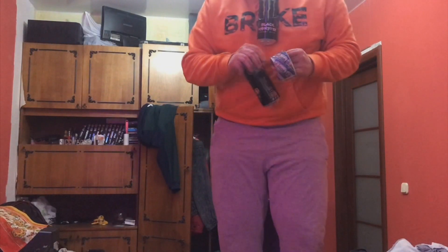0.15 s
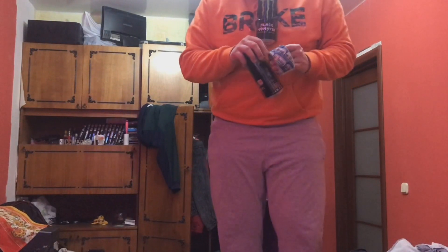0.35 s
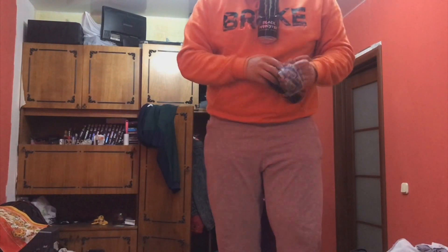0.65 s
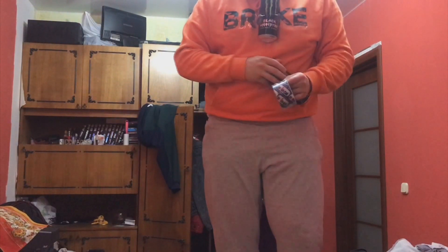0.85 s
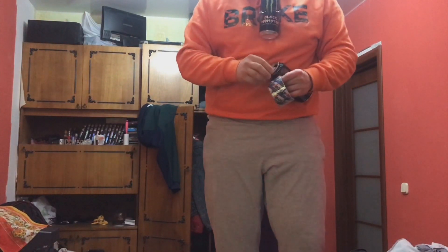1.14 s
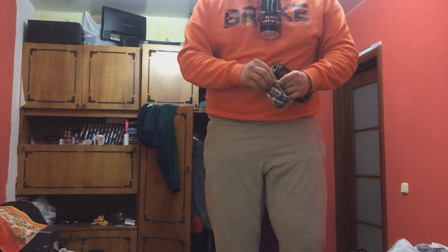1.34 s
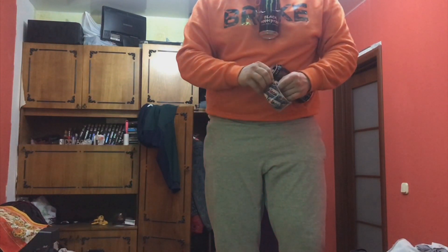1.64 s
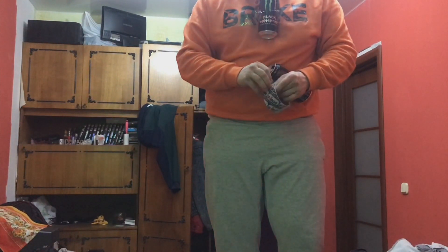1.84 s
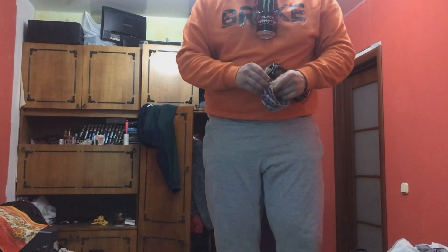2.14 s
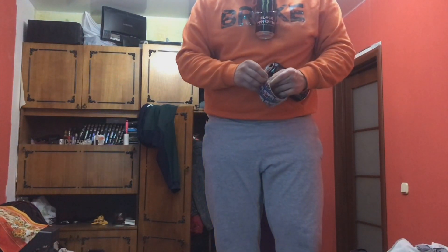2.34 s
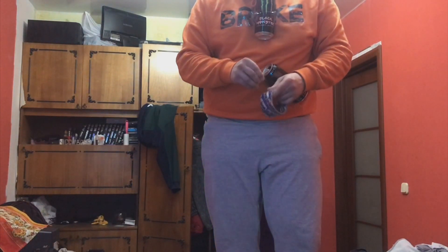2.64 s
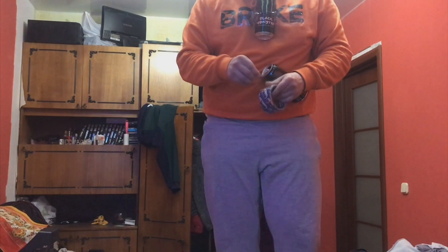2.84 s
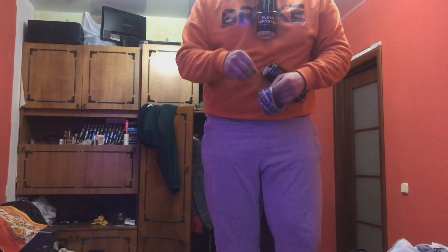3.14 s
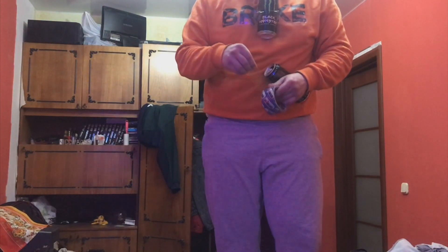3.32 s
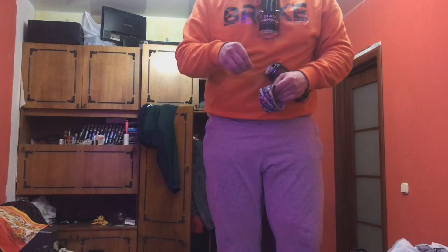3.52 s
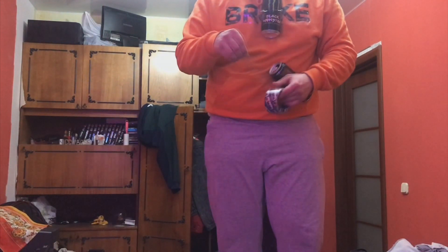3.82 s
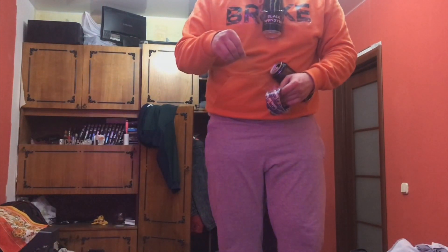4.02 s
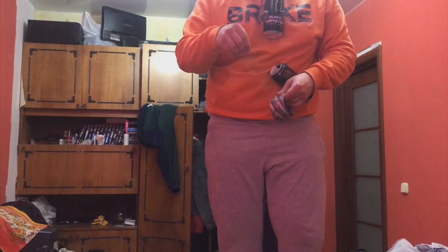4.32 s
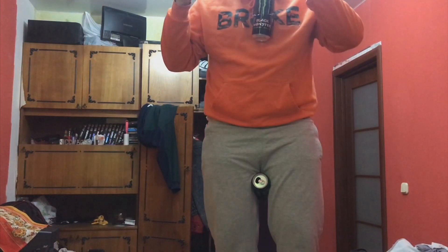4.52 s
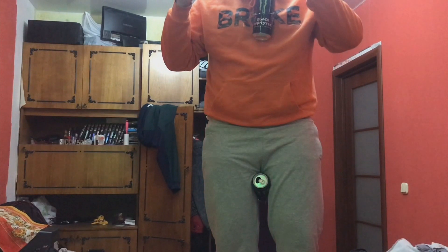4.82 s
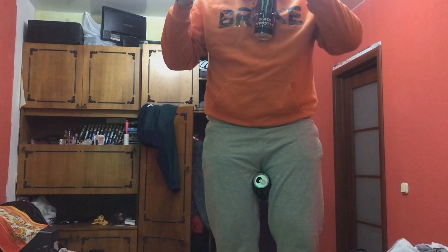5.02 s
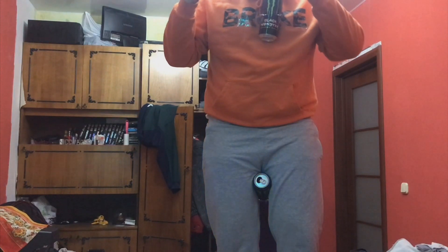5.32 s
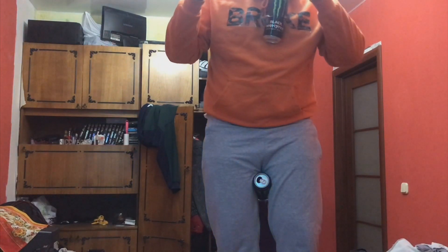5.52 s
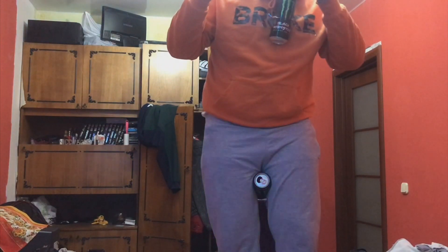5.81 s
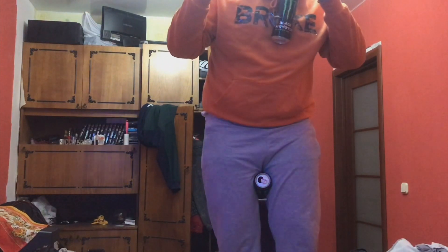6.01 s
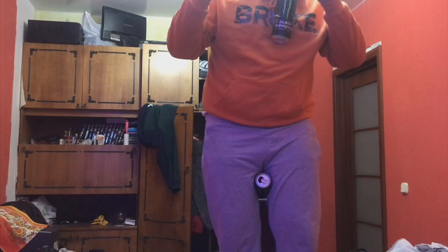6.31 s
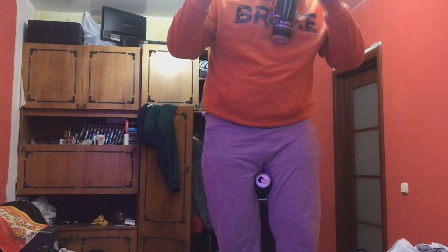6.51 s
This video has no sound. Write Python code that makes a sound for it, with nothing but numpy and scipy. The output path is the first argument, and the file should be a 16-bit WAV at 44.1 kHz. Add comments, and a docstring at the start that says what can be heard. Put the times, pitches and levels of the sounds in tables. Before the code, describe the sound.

A small furnished room with a quiet, dull low floor and short echoes; the microphone is about a metre away. From 0 to 1.2 s fingers shift on thin metal cans with soft, low knocks and rubs. Near 1.7 s two tiny bright clicks sound, then a short crackle at 1.9 s. Around 2.4 to 2.65 s clicks quicken into a loud tinny crunch. Hard, hollow cracks follow at 3.15 to 3.25 s, and a dense, very loud crushing burst with a low thump at 3.6 to 3.67 s. Further sharp snaps come at 4.14, 4.3 and 4.4 s, the last a rattling run. At about 4.5 s the sound and its echo cut off abruptly. Then it is sparse: a light knock, a small click at 4.75 s, faint rubs and ticks, a modest pop at 5.5 s, soft taps near 6 s, and a clear snap at 6.5 s.

```python
"""Squeezing thin aluminium cans

Thin drink cans are handled and squeezed about a metre away in a small furnished room, over a quiet floor.
Fingers knock and rub (filtered grains); each buckle is a noise-burst crack plus a damped panel note.
Hard squeezes set off runs and avalanches of buckles, softly limited where they overload the microphone.
Dull low noise rises and falls behind; early echoes and a diffuse noise tail make the room."""
import sys
import numpy as np
from scipy import signal
from scipy.fft import rfft, irfft
from scipy.io import wavfile
from scipy.ndimage import uniform_filter1d

SR = 44100
rng = np.random.default_rng(int(sys.argv[2]) if len(sys.argv) > 2 else 0)


def bounce(signal):
    """Save signal as a 16-bit WAV file at the path given by the first command-line argument."""
    frames = np.transpose(np.atleast_2d(signal))
    limited = np.clip(frames, -1, 1)
    pcm = np.round(limited * 32767).astype(np.int16)
    wavfile.write(sys.argv[1], SR, pcm)


N = 293706

# the hand takes a new grip, with a dull rub: start_s, length_s, level_db, centre_hz
HAND_GRIPS = [(0, 0.11, -51.5, 555), (0.182, 0.046, -52, 616), (0.426, 0.065, -54, 650),
              (0.736, 0.027, -55, 1730), (0.822, 0.028, -56.5, 1070), (0.915, 0.092, -54.5, 1320),
              (1.042, 0.045, -51.5, 680), (1.151, .026, -53, 930), (4.546, 0.035, -45.5, 620),
              (5.915, 0.038, -57, 480.7), (5.997, .01, -51, 1700), (6.283, .015, -57, 815)]
# skin creeps over the metal under pressure, with a thin hiss: start_s, length_s, level_db
SKIN_SLIDES = [(0.717, 0.3, -72.5), (2.155, 0.044, -59), (2.382, .04, -54.5), (2.82, .23, -58.5),
               (3.0557, .12, -54.5), (3.469, 0.18, -59), (4.113, 0.031, -54.5), (4.7062, 0.06, -54.5),
               (4.94, .17, -67.5), (5.4173, 0.11, -58.5), (5.8322, 0.13, -57), (6.096, 0.05, -54)]


def amp(db):
    """Decibels to gain."""
    return 10 ** (np.asarray(db) / 20)


def unit(x):
    """Scales to an energy of 1."""
    return x / np.sqrt(np.sum(x ** 2) + 1e-20)


def read(points, hz):
    """Interpolates a table on a log-frequency axis."""
    f, value = np.transpose(points)
    return np.interp(np.log(hz + 1), np.log(f + 1), value)


def add(mix, start_s, sound):
    """Mixes a sound in at start_s."""
    part = mix[max(round(start_s * SR), 0):][:len(sound)]
    part += sound[:len(part)]


def band(x, hz, kind, order=2):
    """Causal Butterworth filter."""
    corner_hz = np.clip(hz, 10, SR / 2 - 100)
    return signal.sosfilt(signal.butter(order, corner_hz, kind, fs=SR, output="sos"), x)


def coloured(x, points, size=2048):
    """Minimum-phase filter with a given spectrum, so that attacks stay sharp."""
    log_gain = np.log(amp(read(points, abs(np.fft.fftfreq(size, 1 / SR)))))
    taps = np.fft.ifft(np.exp(signal.hilbert(log_gain).conj())).real
    return signal.oaconvolve(x, taps[:size // 2])[:len(x)]


def flat(x, amount=0.39):
    """Evens out the ripples in the spectrum of a short burst."""
    z = rfft(x)
    return unit(irfft(z / (abs(z) + 1e-9) ** np.clip(amount, 0, 1), len(x)))


def noise(points):
    """Steady noise of rms 1 with a given spectrum."""
    spectrum = rfft(rng.standard_normal(N)) * amp(read(points, np.fft.rfftfreq(N, 1 / SR)))
    return np.sqrt(N) * unit(irfft(spectrum, N))


def crack(low_hz, snap_s=0.00049, shell_s=0.0019, shell_db=-2.5, shell_hz=7000, leak_db=-30, size=1024):
    """A crease jumps in under a millisecond; the dense modes of the shell ring a moment longer."""
    t = np.arange(size) / SR
    jump, shell = rng.standard_normal((2, size))
    fall = np.exp(-t / (2 * snap_s))
    for _ in range(3):
        jump = flat(jump * fall)
    ring = band(shell * np.exp(-t / shell_s), shell_hz, "lowpass", order=1)
    burst = unit(jump * fall) + amp(shell_db) * unit(ring)
    # a small dent radiates little below its own corner frequency
    return unit(band(burst, low_hz, "highpass") - amp(leak_db) * burst)


def panel(hz, cycles=1.7, sag=.09, rise=1.0, overtone_db=-13, chatter=0.73, chatter_s=.0065, size=2048):
    """The flipped panel swings a few times, damped by the hand, its pitch sagging to hz as it relaxes."""
    t = np.arange(size) / SR
    turns = hz * t
    bent = turns + sag * cycles * (1 - np.exp(-turns / cycles))
    overtone = np.sin(2 * np.pi * bent * rng.uniform(1.7, 2.4)) * (hz < SR / 8)  # low notes only
    tone = np.sin(2 * np.pi * bent) + amp(overtone_db) * overtone
    swing = tone * np.exp(-turns / cycles) * (1 - np.exp(-turns / rise))
    # its creased edges chatter and keep nudging it
    push = (t == 0) + chatter * unit(rng.standard_normal(size) * np.exp(-t / chatter_s))
    return unit(band(signal.fftconvolve(swing, push), hz / 2, "highpass", order=1))


def buckle(crack_db, low_hz, note_hz, note_db):
    """A crack, the note of the panel that flips, and the faint answer of the hollow body."""
    hollow_hz, hollow_db = 335, -27.5  # level relative to the panel
    hollow = panel(hollow_hz, cycles=1.1, chatter=.25)
    sound = amp(note_db) * (panel(note_hz) + amp(hollow_db) * hollow)
    add(sound, 0, amp(crack_db) * crack(low_hz))
    return sound


def snaps():
    """Buckles placed one by one, some alone, some within runs, each a crack and a damped note."""
    # start_s, crack_db, crack_low_hz, note_hz, note_db
    placed_buckles = [(1.6922, -9, 5100, 5300, -15), (1.7073, -4.5, 5230, 5600, -34),
                      (1.8979, -9, 2500, 1890, -13.5), (2.423, -7.5, 2450, 5400, -8.5),
                      (2.469, -5, 2100, 2900, -9), (2.492, -1, 2020, 2820, -18),
                      (2.554, 7.5, 2470, 3000, -2.5), (3.1544, 14, 1850, 478, 1),
                      (3.2262, 10, 1500, 1450, 3), (3.594, 12, 1200, 2090, 14.5), (4.1395, 9, 750, 1400, 1),
                      (4.1448, -11.5, 690, 521, -4), (4.298, 12.5, 760, 1990, 5),
                      (4.301, -2, 700, 512, 1.5), (4.3755, 13.5, 891, 494, -3),
                      (4.752, -0.5, 4510, 1920, -7), (5.5035, 0, 1208, 1104, -9.5),
                      (6.525, 8.5, 2820, 930, -1)]
    out = np.zeros(N)
    for start_s, *row in placed_buckles:
        add(out, start_s, buckle(*row))
    return out


def folds(jitter_s=.0005, scatter_octaves=0.22):
    """Each buckle pushes the next one over; the run swells and dies, its note following the dent size."""
    # folds that run round the wall:
    # start_s, length_s, crack_db, crack_low_hz, first_note_hz, last_note_hz, note_db
    fold_runs = [(1.901, 0.012, 7, 3500, 1850, 1250, -1.5), (2.6, 0.043, 11, 1500, 1450, 878, 7),
                 (3.1794, 0.021, 17.5, 2198, 490, 450, 1.5), (3.637, .0307, 12, 1310, 1290, 480, -1.5),
                 (4.4045, 0.029, 17.5, 1205, 1580, 1150, 5)]
    step_s, peak_along, ends_db = .007, 0.34, -6  # peak as a fraction of the run
    out = np.zeros(N)
    for start_s, length_s, crack_db, low_hz, first_hz, last_hz, note_db in fold_runs:
        for along in np.linspace(0, 1, round(length_s / step_s) + 1):
            late, detune = rng.uniform(-1, 1, 2)
            swell_db = np.interp(along, [0, peak_along, 1], [ends_db, 0, ends_db])
            hz = first_hz * (last_hz / first_hz) ** along * 2 ** (scatter_octaves * detune)
            sound = amp(swell_db) * buckle(crack_db, low_hz, hz, note_db)
            add(out, start_s + along * length_s + jitter_s * late, sound)
    return out


def crushes(per_s=1100, spread_db=3, octaves=1.3, note_db=-2, low_hz=1600):
    """One fold triggers the next: a rush of buckles of all sizes."""
    # avalanches: start_s, length_s, level_db, typical_note_hz
    avalanches = [(1.899, .011, -24, 1675), (3.593, 0.024, -5.5, 1636), (3.638, .016, -13.5, 1820),
                  (3.652, .022, -9.5, 1358), (4.1377, 0.0052, -24, 1090), (4.412, .028, -15.5, 996),
                  (5.504, 0.0062, -28.5, 1230), (6.5229, 0.0073, -19, 1950)]
    out = np.zeros(N)
    for start_s, length_s, db, hz in avalanches:
        count = max(int(length_s * per_s), 2)
        pitches = rng.permutation(np.linspace(-1, 1, count))
        strengths = rng.permutation(np.linspace(-1, 1, count))
        for k in range(count):
            at_s = start_s + length_s * (k + rng.random()) / count
            gain = amp(db + spread_db * strengths[k]) * np.sqrt(length_s * SR / count / 2)
            add(out, at_s, gain * crack(low_hz))
            # large slow panels radiate less
            note_gain = gain * amp(note_db + 3 * min(pitches[k], 0))
            add(out, at_s, note_gain * panel(hz * 2 ** (octaves * pitches[k])))
    return out


def thumps():
    """Low, quickly damped thumps under the loudest buckles."""
    # start_s, note_hz, level_db
    low_thumps = [(3.602, 90.5, -13), (3.648, 164, -17), (4.141, 145, -22), (4.3, 150, -19.5),
                  (4.421, 125.9, -13.5)]
    out = np.zeros(N)
    for start_s, hz, db in low_thumps:
        add(out, start_s, amp(db) * panel(hz, cycles=0.91, chatter=.25))
    return out


def ticks(spread_db=3):
    """Creases tick on their own, and at uneven steps while skin creeps over them."""
    # faint lone ticks: start_s, peak_level_db
    lone_ticks = [(0.2628, -34), (0.9957, -38.5), (2.3117, -39), (5.309, -42), (5.7349, -40.5),
                  (5.8798, -32.5), (5.9987, -25), (6.2824, -45.5)]
    step_s, over_slide_db = .06, 17  # mean step; tick peak over the slide's level_db
    out, events = np.zeros(N), list(lone_ticks)
    for start_s, length_s, db in SKIN_SLIDES:
        steps = np.cumsum(step_s * rng.uniform(.5, 1.5, size=8))
        for at_s in [0, *steps[steps < length_s]]:
            events.append((start_s + at_s, db + over_slide_db + spread_db * rng.uniform(-1, 1)))
    for start_s, db in events:
        tick = crack(low_hz=3500, shell_db=1.5)
        add(out, start_s, amp(db) * tick / abs(tick).max())
    return out


def knocks(weaker_db=-1.0, scatter_octaves=0.21):
    """Fingers land on the can one after another during each grip, each exciting a short damped note."""
    finger_step_s, knock_db = 0.027, 24  # knock energy over the grip's level_db
    out = np.zeros(N)
    for start_s, length_s, db, hz in HAND_GRIPS:
        for k, at_s in enumerate(np.arange(0, length_s, finger_step_s)):
            note_hz = hz * 2 ** (scatter_octaves * rng.uniform(-1.06, 1))
            gain = amp(db + knock_db + k * weaker_db)
            add(out, start_s + at_s, gain * panel(note_hz, cycles=1.0, chatter=0.28))
    return out


def rubs(slips_per_s=150, smooth=0.07, width=1.9, fade=0.7, low_hz=360):
    """Skin sticks and slips on the wall: tiny grains over a smooth hiss."""
    slide_hz = 5700
    out = np.zeros(N)
    slips = rng.uniform(-1.1, 1, N) * (rng.random(N) < slips_per_s / SR)
    grains = smooth * rng.standard_normal(N) + slips
    for start_s, length_s, db, hz in HAND_GRIPS + [(*row, slide_hz) for row in SKIN_SLIDES]:
        stroke = grains[max(round(start_s * SR), 0):][:int(length_s * SR)]
        swell = signal.windows.tukey(len(stroke), .06) * np.exp(-fade * np.linspace(0, 1, len(stroke)))
        centred = band(stroke * swell, [hz / width, hz * width], "bandpass", order=1)
        body = band(centred, low_hz, "highpass")
        muffled = band(body, hz * 3.8, "lowpass", order=1)
        add(out, start_s, amp(db - 5) * np.sqrt(len(stroke)) * unit(muffled))
    return out


def tail(wet_db=-2, late_db=-35, late_s=1.9, build_s=0.0026, gap_s=0.0018, patchy_db=2):
    """Diffuse echo of the room: it builds up quickly, the treble dies first, and a faint late ring stays."""
    # decay time: frequency_hz, t60_s
    decay_times = [(130, 0.39), (260, 0.39), (450, 0.32), (1200, 0.28), (3000, 0.32), (7000, 0.27),
                   (15000, .21)]
    # tail spectrum: frequency_hz, level_db
    tail_colour = [(80, -7), (135, 3.5), (220, 6.5), (450, 3), (1200, 0), (3000, -2), (7000, -2),
                   (15000, -3.5)]
    t = np.arange(SR) / SR
    hz, at_s, z = signal.stft(rng.choice([-1., 1.], SR), SR, nperseg=512)
    decay = amp(-60 * at_s / read(decay_times, hz)[:, None])
    late = amp(late_db) * np.exp(-np.log(1000) * at_s / late_s) / (1 + hz[:, None] / 4000)
    # furniture sends the sound back in uneven clumps
    clumps = uniform_filter1d(rng.standard_normal(z.shape), size=7, axis=0)
    z = z / (abs(z) + 1e-9) * (decay + late) * amp(patchy_db * clumps / clumps.std())
    build = 1 - np.exp(-np.maximum(t - gap_s, 0) / build_s)
    echo = signal.istft(z, SR, nperseg=512)[1][:SR] * build
    return amp(wet_db) * coloured(unit(echo), tail_colour)


def room(sides):
    """The first side of the can faces the microphone; every side feeds its own echoes and tail."""
    # nearby surfaces: delay_s, gain
    surfaces = [(.0043, 0.27), (.0058, 0.2), (.0088, 0.14), (0.0144, .13), (0.014, .2), (.0205, 0.058)]
    cut_s, cut_fade_s = 4.511, 0.0076
    time = np.arange(N) / SR
    before, after = np.zeros((2, N))
    paths = [(0.00044, 1)] + surfaces  # direct sound first
    for k, x in enumerate(sides):
        response = tail() / np.sqrt(len(sides))
        for delay_s, gain in paths[k::len(sides)]:
            add(response, delay_s, np.array([gain]))
        add(before, 0, signal.fftconvolve(x * (time < cut_s), response))
        add(after, 0, signal.fftconvolve(x * (time >= cut_s), response))
    # the first squeezing and its echo are cut off abruptly; later handling starts with a fresh echo
    return before * np.clip((cut_s - time) / cut_fade_s, 0, 1) + after


def low_background():
    """Dull low background noise that rises and falls under a level curve."""
    # level curve: time_s, level_db
    level_curve = [(0, -58), (0.701, -71.5), (1.0, -56.5), (1.3, -81), (1.9, -81), (2.4, -60), (2.9, -58.5),
                   (3.5, -56), (3.999, -58.5), (4.45, -56), (4.55, -82), (6.66, -90)]
    # noise spectrum: frequency_hz, relative_density_db_per_hz
    dull_spectrum = [(20, -14), (45, 3), (90, -7), (135, -1), (220, -6), (550, -8), (1500, -15),
                     (3000, -21), (8000, -37), (16000, -37)]
    return amp(np.interp(np.arange(N) / SR, *np.transpose(level_curve))) * noise(dull_spectrum)


def quiet_floor(level_db=-62.5):
    """Steady background noise with a fixed spectrum."""
    # floor spectrum: frequency_hz, relative_density_db_per_hz
    floor_spectrum = [(12, -34.5), (20, 1.5), (150, 1), (270, -4), (367, -3), (422, -4), (499, -1),
                      (949, -10), (1220, -5.5), (2260, -11), (4940, -22), (6720, -21), (10500, -27),
                      (12800, -25.5), (16000, -34)]
    return amp(level_db) * noise(floor_spectrum)


def scene(count=2):
    """The cans in the room, over a varying low background and a quiet floor."""
    # spectrum of the can's impacts: frequency_hz, level_db
    can_colour = [(200, -1), (700, -4), (1200, -1), (2500, -3), (4200, -0.5), (6500, -0.5), (9500, -1),
                  (12000, 0), (16000, -1.5)]
    handling = rubs()
    sides = []
    # a crumpled wall radiates a different waveform in each direction
    for _ in range(count):
        impacts = snaps() + folds() + crushes() + thumps() + ticks() + knocks()
        sides.append(coloured(impacts, can_colour) + handling)
    return band(room(sides) + quiet_floor() + low_background(), 32, "highpass", order=4)[None]


def record(dry, ceiling=1.0, edge_hz=16000):
    """The microphone overloads softly on the loudest cracks; then a lowpass limits the band."""
    limited = dry / (1 + (dry / ceiling) ** 4) ** (1 / 4)
    taps = signal.firwin(511, edge_hz, window=("kaiser", 9), fs=SR)
    return signal.oaconvolve(limited, taps[None], "same")


dry = scene()
out = record(dry)
bounce(out)
```